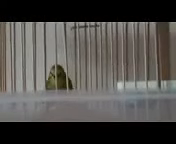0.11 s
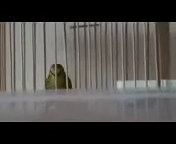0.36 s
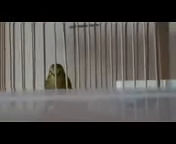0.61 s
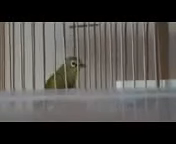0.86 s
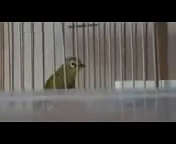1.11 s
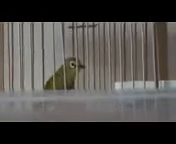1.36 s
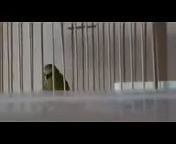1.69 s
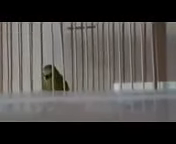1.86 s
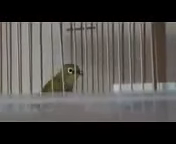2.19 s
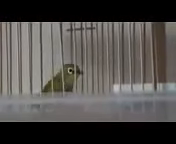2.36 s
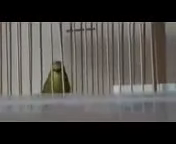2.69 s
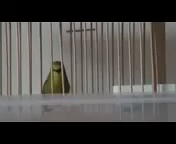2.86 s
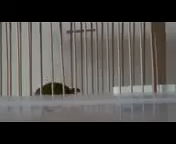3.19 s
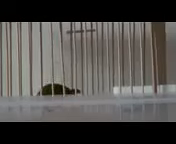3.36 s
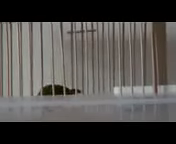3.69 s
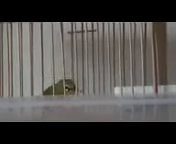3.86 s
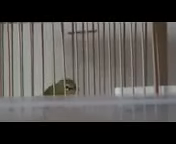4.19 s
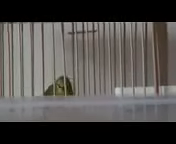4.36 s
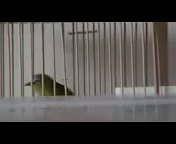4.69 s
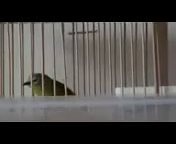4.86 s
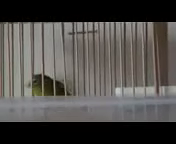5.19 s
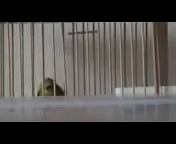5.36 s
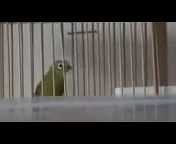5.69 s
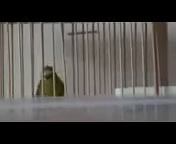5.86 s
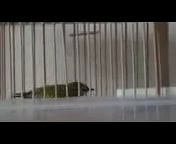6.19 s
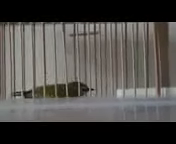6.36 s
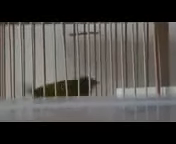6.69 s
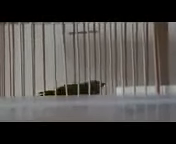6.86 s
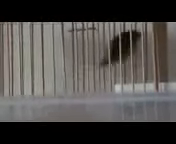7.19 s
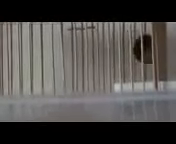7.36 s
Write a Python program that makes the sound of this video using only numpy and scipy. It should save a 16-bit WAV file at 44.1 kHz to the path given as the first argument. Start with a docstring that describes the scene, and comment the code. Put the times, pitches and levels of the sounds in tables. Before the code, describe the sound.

A small caged songbird whistles rapid liquid gliding notes in an echoing room, then a fainter second bird answers over a low steady fan drone.

```python
"""A small songbird, the nearer of two in a hard-walled room, sings gliding whistles that smear in the
reverberation. A second, farther bird with a strong overtone answers. Each whistle is a gliding sine with
its octave, passed through a random, decaying room answer. A fan drones underneath: noise coloured by the
room's low modes, with unsteady blade tones. One microphone channel takes it in, up to about 8 kHz."""
import sys
import numpy as np
from scipy import signal
from scipy.fft import rfft, irfft, next_fast_len
from scipy.io import wavfile
from scipy.ndimage import uniform_filter1d, map_coordinates

SR = 44100
rng = np.random.default_rng(int(sys.argv[2]) if len(sys.argv) > 2 else 0)


def linear_from_db(decibels):
    """Turn decibels (scalar or array-like) into linear amplitude factors; 0 gives 1."""
    return 10 ** (np.asarray(decibels, float) / 20)


def put_to_file(sound):
    """Save the sound as 16-bit audio at rate SR, in the file named by the first command-line argument."""
    columns = np.atleast_2d(sound).T  # one column per channel
    safe = np.clip(columns, -1, 1)
    whole_steps = np.round(safe * 32767)
    wavfile.write(sys.argv[1], SR, whole_steps.astype(np.int16))


N = 331191  # length in samples


def unit(x):
    """Scales a signal to rms 1."""
    return x / np.sqrt(np.mean(x ** 2) + 1e-20)


def along(points, hz):
    """Reads (Hz, value) points between their knots on a log frequency axis."""
    point_hz, value = np.transpose(points)
    return np.interp(np.log(hz + 1), np.log(point_hz + 1), value)


def wobble(rate, count=N):
    """A smooth random curve through normal draws, rate knots a second."""
    knots = rng.standard_normal(int(count * rate / SR) + 4)
    return map_coordinates(knots, [np.arange(count) * rate / SR])


def filtered(x, response):
    """Multiplies the spectrum of x by a response of frequency."""
    size = next_fast_len(N + 8192)
    spectrum = rfft(x, size) * response(np.fft.rfftfreq(size, 1 / SR))
    return irfft(spectrum, size)[:N]


# The near bird's song in the room, slur by slur. Each row: start in seconds, length in seconds,
# first pitch in Hz, last pitch in Hz, peak level in dB before the throat's colouring.
NEAR_SONG = [ (-.09, 0.095, 3780, 3080, -33.5), (-.008, 0.022, 2910, 2510, -24),
             (.016, 0.035, 2450, 1920, -25.5), (.096, 0.02, 2480, 2737, -27.5),
             (.122, .014, 2745, 2700, -22), (.135, 0.016, 2820, 3240, -35), (.221, 0.03, 4700, 5370, -27.5),
             (.246, 0.011, 5210, 5710, -24), (.246, 0.024, 3680, 4010, -34.5),
             (.268, 0.011, 3770, 4160, -26.5), (.284, 0.012, 4150, 3860, -21.5),
             (.293, 0.012, 3910, 3280, -26), (.462, 0.051, 3640, 3924, -26),
             (.484, 0.041, 3785, 3800, -24.5), (.516, .026, 3903, 3480, -23), (.54, 0.031, 3580, 2680, -27),
             (.65, 0.026, 2070, 2536, -24.5), (.675, 0.0587, 2460, 2645, -19.5),
             (.988, 0.02, 2230, 3290, -34), (1.011, 0.012, 2307, 3980, -26),
             (1.024, 0.027, 4020, 2960, -22.5), (1.046, 0.019, 3100, 2877, -15),
             (1.225, .022, 2570, 2060, -32.5), (1.29, 0.035, 2413, 2634, -27),
             (1.316, 0.029, 2680, 2620, -24.5), (1.343, 0.052, 2600, 1980, -27),
             (1.385, 0.055, 4040, 3320, -43.5), (1.425, 0.049, 3370, 3190, -43.5),
             (1.522, 0.014, 3790, 4990, -23.5), (1.53, 0.023, 5090, 4834, -22),
             (1.547, 0.017, 4900, 2970, -22.5), (1.565, 0.046, 2890, 2950, -29.5),
             (1.61, 0.032, 3415, 3430, -29), (1.635, 0.052, 3363, 3204, -19.5),
             (1.684, 0.037, 3180, 2860, -18), (1.712, 0.023, 2865, 2665, -22.5),
             (2.03, 0.025, 2470, 2710, -30.5), (2.054, 0.018, 2596, 5050, -24),
             (2.076, 0.028, 5080, 2280, -25), (2.166, 0.021, 3910, 3900, -17),
             (2.192, 0.021, 3850, 3770, -25.5), (2.218, 0.019, 3700, 3730, -20.5),
             (2.26, .04, 3666, 3210, -20), (2.295, 0.061, 3170, 3126, -24), (2.468, 0.014, 5230, 6420, -22),
             (2.479, 0.011, 5390, 4240, -16.5), (2.487, 0.018, 4180, 3750, -13.5),
             (2.502, 0.018, 3650, 2910, -19), (2.512, 0.012, 2930, 2100, -25.5),
             (2.558, .03, 2097, 2490, -25.5), (2.585, 0.065, 2400, 2615, -19.5),
             (2.648, 0.0387, 2646, 2900, -20), (2.678, 0.022, 2912, 2906, -14.5),
             (2.696, 0.02, 2874, 3120, -15.5), (2.716, 0.027, 3170, 3375, -27)]
# The near bird's breath over a rising, then any other slur. Each holds: share of the length before the
# loudest moment, start in dB below peak, end in dB below peak, easing exponent of the glide.
NEAR_RISING = (0.61, 4.2, 4.9, 1.25)
NEAR_FALLING = (.5, 2.8, 5.1, 1.25)
# How strongly the near bird's throat carries a pitch. Each row: pitch in Hz, gain in dB.
NEAR_THROAT = [(2000, -6.5), (2600, -2), (3200, 1.5), (4000, -2), (5200, -1), (6400, -18.5)]


def near_bird():
    """The near singer: almost pure whistles, with less room around them than the far bird has."""
    whistles = slurs(NEAR_SONG, NEAR_RISING, NEAR_FALLING, NEAR_THROAT)
    return bird(whistles, overtone_db=-43.5, strain=0, flutter_db=2.5, jitter=0.012, wet_db=3)


# The far bird's answer across the room, slur by slur. Each row: start in seconds, length in seconds,
# first pitch in Hz, last pitch in Hz, peak level in dB before the throat's colouring.
FAR_SONG = [ (3.598, 0.014, 3260, 3190, -42), (3.62, 0.02, 3280, 2600, -41),
            (3.81, 0.015, 3060, 3380, -39.5), (3.838, 0.018, 3300, 2460, -39.5),
            (3.98, 0.021, 3200, 3275, -41), (4.0, 0.029, 3200, 2380, -45), (4.03, 0.041, 3410, 3174, -48),
            (4.07, 0.045, 3350, 3040, -46), (4.11, 0.0614, 3220, 2910, -46), (4.175, .075, 3135, 2820, -48),
            (4.606, 0.05, 4020, 3050, -43), (4.653, 0.046, 2990, 3070, -38),
            (4.712, 0.027, 3120, 2983, -38.5), (4.726, 0.032, 2900, 2343, -36),
            (4.76, 0.036, 2310, 1950, -36), (4.995, 0.035, 3330, 3120, -43.5),
            (5.03, 0.037, 3150, 2875, -37), (5.068, .055, 2900, 2410, -45), (5.31, 0.036, 4250, 3300, -42),
            (5.34, 0.049, 3380, 3150, -39), (5.4, 0.037, 3150, 2600, -39.5), (5.42, 0.046, 3255, 3200, -43),
            (5.465, 0.04, 3260, 3750, -40), (5.555, 0.01, 5290, 4040, -34),
            (5.564, 0.026, 3884, 3690, -35.5), (5.594, 0.066, 3660, 3097, -36),
            (5.744, 0.014, 5590, 3830, -38.5), (5.749, 0.031, 3880, 3640, -34.5),
            (5.78, 0.055, 3580, 3120, -34.5)]
# The far bird's breath over a rising, then any other slur. Each holds: share of the length before the
# loudest moment, start in dB below peak, end in dB below peak, easing exponent of the glide.
FAR_RISING = (0.51, 4.3, 5.6, 0.98)
FAR_FALLING = (0.55, 2, 3.6, 1.4)
# How strongly the far bird's throat carries a pitch. Each row: pitch in Hz, gain in dB.
FAR_THROAT = [(2000, -11.5), (2600, 0), (3200, 1), (4000, 1), (5600, 2)]


def far_bird():
    """The farther singer: a strong octave, a less steady voice and more room than direct sound."""
    whistles = slurs(FAR_SONG, FAR_RISING, FAR_FALLING, FAR_THROAT)
    return bird(whistles, overtone_db=-10.5, strain=1.0, flutter_db=4.5, jitter=0.028, wet_db=8)


def slurs(rows, rising, falling, throat):
    """A slur swells to its loudest moment and fades, while its pitch glides to its goal along a power curve."""
    whistles = []
    for start, length, from_hz, to_hz, peak_db in rows:
        loudest, attack_db, release_db, easing = rising if to_hz > from_hz else falling
        u = np.linspace(0, 1, num=25)  # share of the slur gone by
        pitch = to_hz + (from_hz - to_hz) * (1 - u) ** easing
        swell_db = np.interp(u, [0, np.clip(loudest, 0.05, 0.95), 1], [-attack_db, 0, -release_db])
        level_db = peak_db + swell_db + along(throat, pitch)
        whistles.append(np.transpose([start + length * u, pitch, level_db]))
    return whistles


def bird(whistles, overtone_db, strain, flutter_db, jitter, wet_db):
    """Gliding sines with their octave; the bird turns its head, so each whistle meets a new room answer."""
    throat_hz, throat_width_hz = 6300, 1800  # resonance that favours the octave
    out = np.zeros(N + 2 * SR)  # starts one second early, for the whistle already ringing
    edge = round(0.0012 * SR)  # fade of 1.2 ms at either end
    for rows in whistles:
        knot_s, knot_hz, knot_db = np.transpose(rows)
        t = np.arange(knot_s[0], max(knot_s[-1], knot_s[0] + 0.0065), 1 / SR)
        pitch = uniform_filter1d(np.interp(t, knot_s, knot_hz), size=90, mode="nearest")
        pitch *= 1 + jitter * wobble(420, count=len(t))  # the syrinx never holds quite steady
        phase = 2 * np.pi * np.cumsum(pitch) / SR
        # with strain, harder blowing brings out the octave
        octave_db = overtone_db + strain * (knot_db.max() + 34.5)
        resonance = 1 / (1 + ((2 * pitch - throat_hz) / throat_width_hz) ** 4)
        tone = np.sin(phase) + linear_from_db(octave_db) * resonance * np.sin(2 * phase)
        i = np.arange(len(t))
        fade = np.clip(np.minimum(i, i[::-1]) / edge, 0, 1)
        level_db = np.interp(t, knot_s, knot_db)
        tone *= fade * linear_from_db(level_db + flutter_db * wobble(118, count=len(t)))
        heard = signal.fftconvolve(tone, room_answer(wet_db))
        start = round((knot_s[0] + 1) * SR)
        out[start:start + len(heard)] += heard
    return out[SR:SR + N]


# How long the hard-walled room rings.
# Each row: frequency in Hz, time in seconds for the tail's own decay to fall by 60 dB.
ROOM_DECAY = [(2000, 0.41), (3000, 0.51), (4200, 0.57), (6000, 0.44), (8000, 0.31)]


def room_answer(wet_db):
    """The direct sound, then a diffuse tail in which each frequency dies at its own speed."""
    grain_db = 3  # scatter of the reflections in time and pitch
    early_db, early_s = -0.5, 0.012  # extra start of the tail off the nearest walls: level, time constant
    build_up_s = 0.0051  # reflections take a few ms to build up
    hz, t, z = signal.stft(rng.standard_normal(SR * 3 // 4), SR, nperseg=256)
    z = z * linear_from_db(grain_db * rng.standard_normal(z.shape))  # some reflections stand out
    decay = linear_from_db(-60 * t / along(ROOM_DECAY, hz)[:, None])
    tail = signal.istft(z * decay, SR, nperseg=256)[1]
    age = np.arange(len(tail)) / SR
    tail *= 1 - np.exp(-age / build_up_s)
    tail *= 1 + linear_from_db(early_db) * np.exp(-age / early_s)
    tail *= linear_from_db(wet_db) / np.linalg.norm(tail)  # tail energy over direct sound
    tail[0] += 1  # the direct sound
    return tail


# The fan's air noise before the modes lift it.
# Each row: frequency in Hz, relative density in dB per Hz.
FAN_AIR = [(20, -27), (32, -34), (45, -31.5), (80, -26), (120, -17.5), (180, -15.5), (300, -10.5),
           (400, -19.5), (600, -20.5), (800, -21.5), (1500, -21.5), (2250, -23.5), (3400, -31.5),
           (4500, -31.5), (7800, -41.5), (8600, -47.5)]
# Low resonances of the room and the fan housing.
# Each row: centre in Hz, width in Hz, lift in dB at the centre for that mode alone.
ROOM_MODES = [(108, 27, 7), (151.7, 8.8, 13), (205.6, 9.5, 13.5), (266, 21, 7.5), (276, 58, 0.5),
              (349.4, 35, 13), (443, 25, 7), (505.3, 34, 9.5), (641.4, 25, 12), (673.5, 71, 7.5),
              (726, 49, 4.5), (856, 13, 8.5), (960, 190, 6), (1622, 260, 3.5), (2280, 38, 7.5)]
# Fan and motor tones. Each row: frequency in Hz, level in dB rms about which the tone wavers.
FAN_TONES = [(334, -38), (667, -50), (896, -59.5)]


def fan():
    """Air noise lifted at the room's modes, and tones that waver in level and phase."""
    def air_response(hz):
        lift = 1
        for centre_hz, width_hz, lift_db in ROOM_MODES:
            lift = lift + (linear_from_db(lift_db) - 1) / (1 + (2 * (hz - centre_hz) / width_hz) ** 2)
        return linear_from_db(along(FAN_AIR, hz)) * lift

    air = unit(filtered(rng.standard_normal(N), air_response))
    t = np.arange(N) / SR
    tones = np.zeros(N)
    for hz, level_db in FAN_TONES:
        level = np.sqrt(2) * linear_from_db(level_db + 2.4 * wobble(9))
        tones += level * np.sin(2 * np.pi * hz * t + 1.18 * wobble(5))
    air_db = -31.5 + 0.75 * wobble(1.4)  # the rush drifts slowly in level
    return linear_from_db(air_db) * air + tones


def scene():
    """The near bird, the far bird and the fan together, as one channel."""
    return (near_bird() + far_bird() + fan())[None]


def drop_masked(x, under_db, up_db_per_khz, down_db_per_khz, from_hz, linger):
    """Bands hidden by louder ones above from_hz fall silent; hiding reaches farther up than down and lags."""
    hz, _, z = signal.stft(x, SR, nperseg=1024)
    power = uniform_filter1d(np.abs(z) ** 2, size=5, axis=0)  # over neighbouring bands
    power = uniform_filter1d(power, size=3, axis=1) + 1e-20  # over neighbouring moments
    gap_khz = (hz[:, None] - hz) / 1000  # from the hiding band to the hidden one
    reach_db = np.where(gap_khz > 0, -up_db_per_khz * gap_khz, down_db_per_khz * gap_khz)
    spread = linear_from_db(2 * (reach_db - under_db)) * (hz > from_hz)
    hidden = signal.lfilter([1 - linger], [1, -linger], spread @ power, axis=1)
    keep = 1 / (1 + (hidden / power) ** 4)
    return signal.istft(z * keep, SR, nperseg=1024)[1][:N]


def band_limit(x):
    """A steep low-pass at the top of the band."""
    return signal.sosfilt(signal.butter(12, 8010, fs=SR, output="sos"), x)


def record(dry):
    """Hidden bands drop out, and the sound is cut steeply above its band limit."""
    top_hz = 7950
    kept = drop_masked(dry[0], under_db=22.7, up_db_per_khz=12.83, down_db_per_khz=42, from_hz=1800, linger=0.59)
    mix = filtered(kept, lambda hz: 1 / (1 + (hz / top_hz) ** 60))[None]
    return band_limit(mix)


dry = scene()
out = record(dry)
put_to_file(out)
```